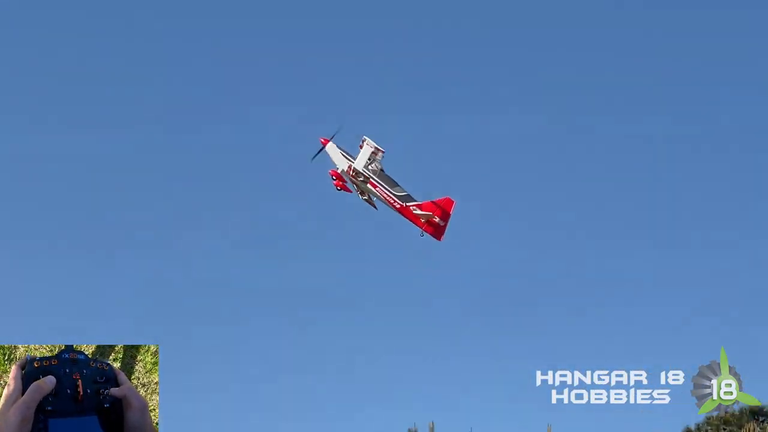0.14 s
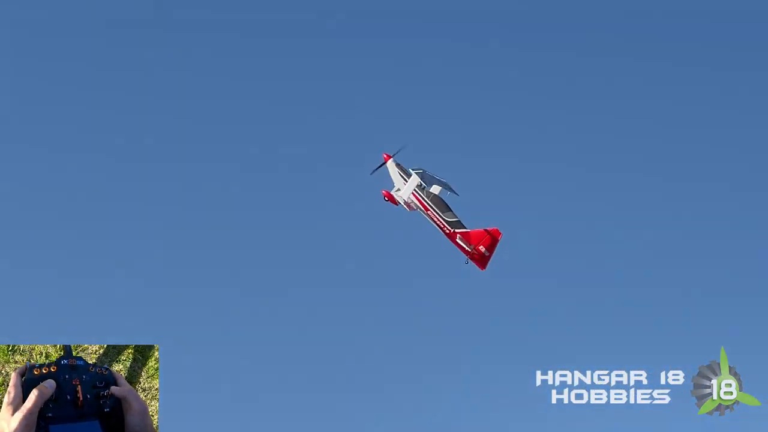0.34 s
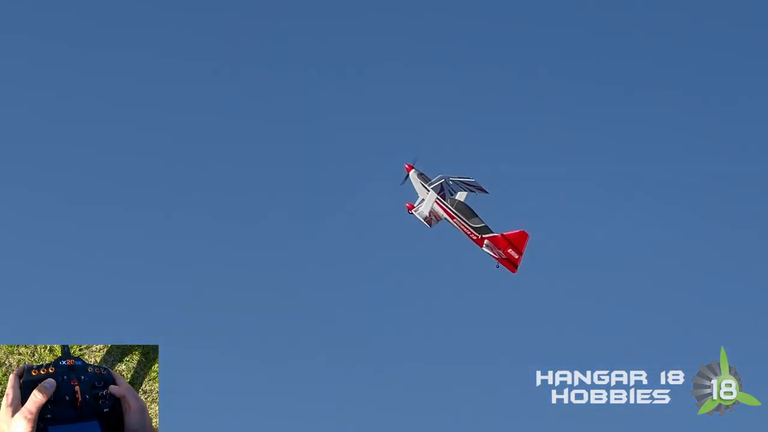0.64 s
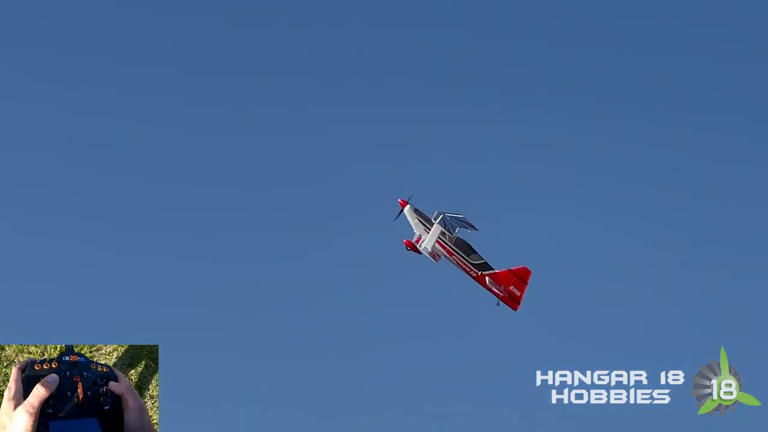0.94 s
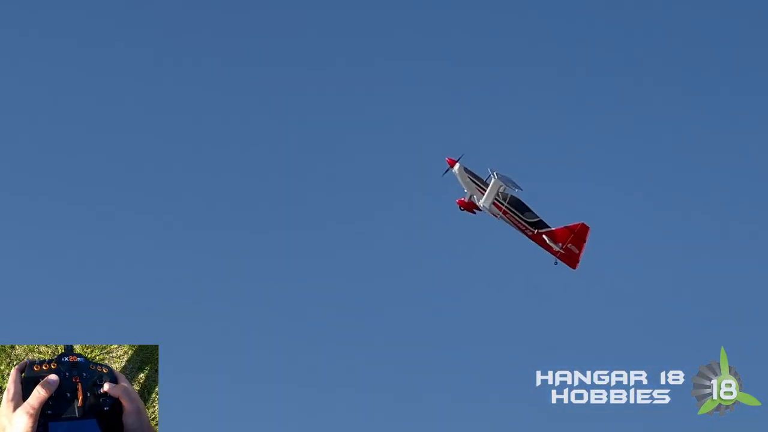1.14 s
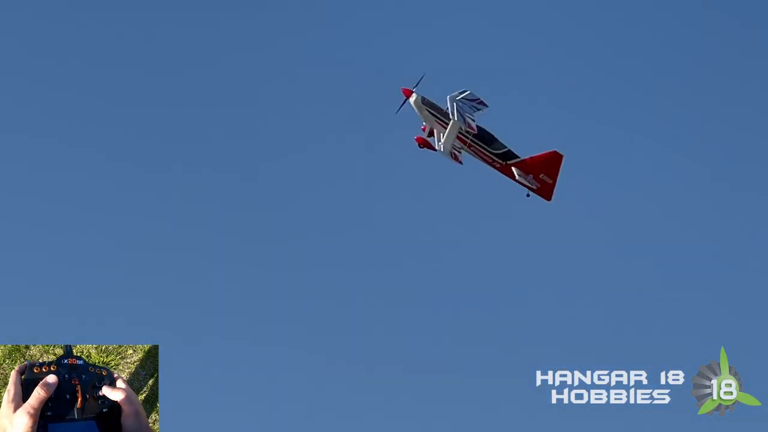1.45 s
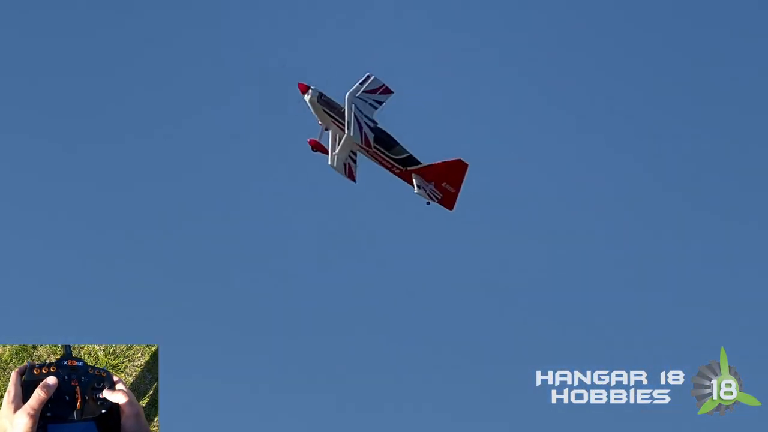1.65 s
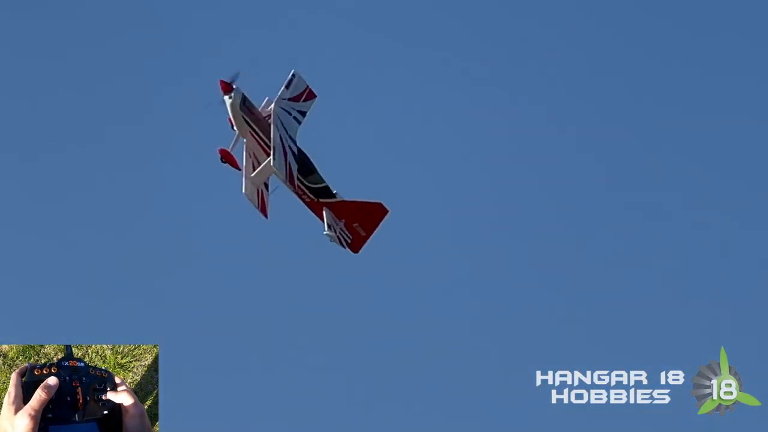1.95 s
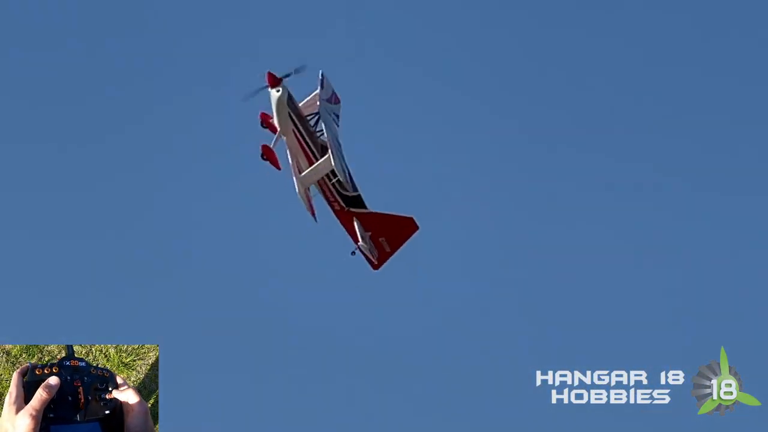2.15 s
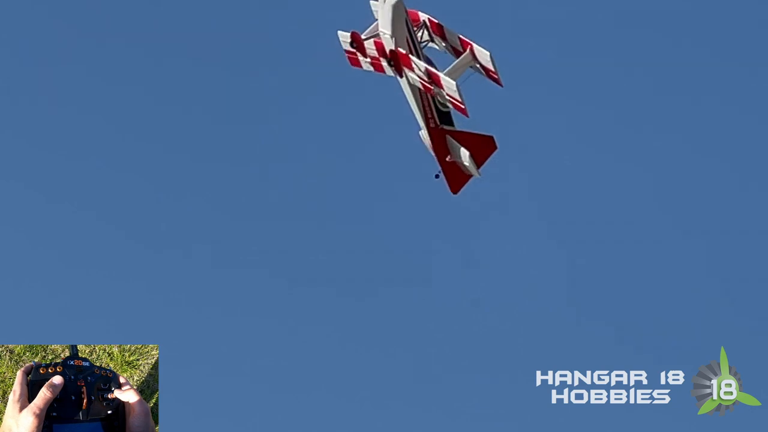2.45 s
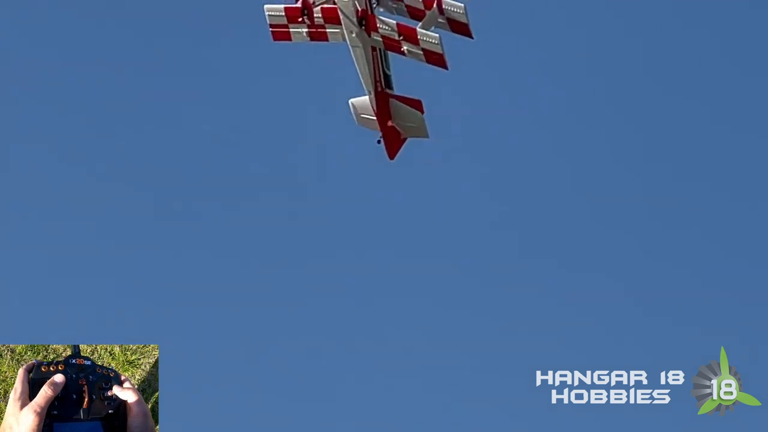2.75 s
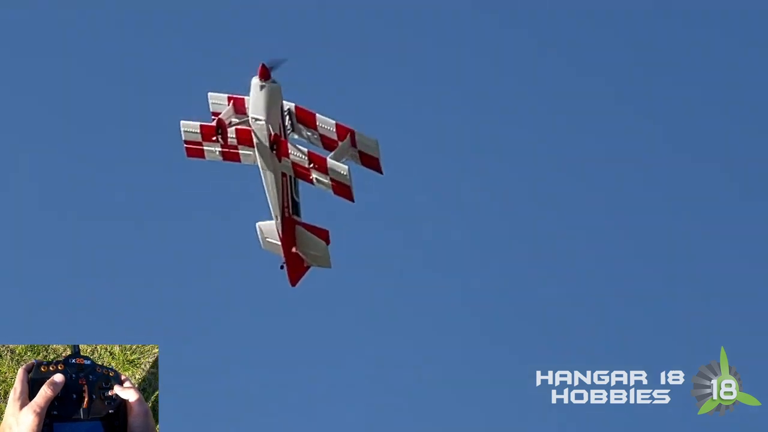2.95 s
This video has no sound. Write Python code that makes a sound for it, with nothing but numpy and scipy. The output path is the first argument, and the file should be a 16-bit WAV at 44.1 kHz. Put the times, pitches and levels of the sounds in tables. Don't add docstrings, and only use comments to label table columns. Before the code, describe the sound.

Outdoors, gusts thump and rumble on an unshielded stereo microphone while a model airplane's propeller rises from a weak swish to a louder, higher buzz, then holds its pitch in a hover, with a few tiny clicks.

```python
import sys
import numpy as np
from scipy import signal
from scipy.fft import rfft, irfft, next_fast_len
from scipy.io import wavfile
from scipy.ndimage import uniform_filter1d

SR = 44100
rng = np.random.default_rng(int(sys.argv[2]) if len(sys.argv) > 2 else 0)


def ratio_of_db(decibels):
    return 10 ** (np.asarray(decibels, float) / 20)


def put_to_file(sound):
    columns = np.atleast_2d(sound).T
    safe = np.clip(columns, -1, 1)
    whole_steps = np.round(safe * 32767)
    wavfile.write(sys.argv[1], SR, whole_steps.astype(np.int16))


N = 136710
T = np.arange(N) / SR

# start_s, shaft_hz, motor_whine_db, blade_swish_db, tip_hiss_db
MOTOR = [(0, 82.2, -57, -49, -74), (.43, 82.3, -52, -46, -70), (.55, 95, -40, -41, -59),
         (.68, 101.8, -57, -41, -57), (.76, 100.9, -52, -40, -57), (.88, 111.8, -45, -41, -61),
         (.97, 114.2, -46, -41, -60), (1.11, 111.9, -45, -40, -59), (1.24, 115.2, -44, -39, -67),
         (1.41, 119.5, -46, -35, -63), (1.5, 124.2, -45, -35, -62), (1.72, 130.8, -38, -35, -63),
         (2.1, 131.9, -34, -36, -66), (2.48, 132.3, -52, -40, -57), (2.62, 132.5, -34, -35, -51),
         (2.79, 132.5, -34, -35, -51), (2.84, 132.6, -48, -38, -53), (3.1, 132.45, -44, -34, -47)]
SHAFT_JITTER = .0002


def plane():
    speed_hz, whine_db, swish_db, tip_db = curves(MOTOR, size=1300)
    turns = np.cumsum(speed_hz * (1 + SHAFT_JITTER * slow(top_hz=44.3))) / SR
    lines = disc_tones(turns) + weak_tones(turns, swish_db)
    lines = lines + motor_whine(turns, whine_db) + switching_fold(turns, speed_hz, swish_db)
    lines = coloured(lines, lambda hz: 1 / np.sqrt(1 + (hz / 8700) ** 40))
    ports = two_ports(lines + blade_air(turns, swish_db, tip_db) + ticks())
    return ports + diffuse_air(turns, swish_db, tip_db)


# start_s, then level_db of each of DISC_ORDERS
DISC = [(0, -66, -54, -59, -81), (0.451, -63.5, -93.5, -46.5, -88), (.7, -63, -41.5, -40.5, -81),
        (.9, -32.5, -40, -45, -57.5), (1.1, -35.5, -42, -44, -65), (1.3, -27, -37, -44, -55.5),
        (1.5, -24.5, -31.5, -37.5, -41.5), (1.7, -19.5, -31, -39, -37), (1.9, -22.5, -29.5, -41.5, -37.5),
        (2.101, -25, -32, -57, -42.5), (2.3, -24, -32.5, -45.5, -42), (2.5, -26, -41, -38, -41),
        (2.7, -22.5, -58, -33.5, -35), (2.9, -23, -66, -32, -55), (3.1, -23.5, -37, -31.5, -47)]
DISC_ORDERS = (2, 3, 4, 6)


def disc_tones(turns):
    levels_db = curves(DISC, size=1800)
    return sum(tone(k * turns, db, waver_db=1.1) for k, db in zip(DISC_ORDERS, levels_db))


WEAK_ORDERS = (1, 5, 7, 8, 9, 10, 11, 12, 13, 14)
WEAK_DB = [-9, -14, -6, -12, -13, -13, -14, -11, -11, -18]
HOVER_FROM_S, HOVER_S, BEFORE_HOVER_DB = 1.8, .5, -13


def weak_tones(turns, swish_db):
    climb_db = BEFORE_HOVER_DB * np.clip(1 - (T - HOVER_FROM_S) / HOVER_S, 0, 1)
    out = 0
    for order, db in zip(WEAK_ORDERS, WEAK_DB):
        level_db = swish_db + db + (order in (5, 7)) * climb_db
        out = out + tone(order * turns, level_db, waver_db=3.5)
    return out


# start_s, then level_db of each of WHINE_ORDERS
WHINE = [(0, -72, -66, -72, -86), (.42, -62, -64, -61, -82), (.52, -52, -60, -51, -60),
         (.66, -51, -63, -52, -58), (.73, -55, -62, -70, -63), (.82, -52, -56, -68, -64),
         (.92, -58, -50, -54, -84), (1.1, -56, -48, -50, -88), (1.25, -58, -47, -62, -90),
         (1.42, -53, -47, -66, -90), (1.62, -54, -52, -52, -90), (1.9, -54, -56, -64, -90),
         (2.2, -54, -51, -59, -90), (2.35, -60, -54, -58, -90), (2.55, -61, -54, -67, -90),
         (2.75, -47, -53, -52, -90), (2.9, -53, -60, -58, -90), (3.1, -51, -54, -56, -90)]
WHINE_ORDERS = (21, 28, 63, 84)
MAIN_WHINE_ORDER = 42


def motor_whine(turns, main_db):
    out = tone(MAIN_WHINE_ORDER * turns, main_db, waver_db=1.5)
    for order, db in zip(WHINE_ORDERS, curves(WHINE, size=1800)):
        out = out + tone(order * turns, db, waver_db=1.5)
    return out


SWITCH_HZ, FOLD_DB = 17950, -27
FULL_POWER_HZ, FOLD_FADE_DB_PER_HZ = 122, 5


def switching_fold(turns, speed_hz, swish_db):
    level_db = swish_db + FOLD_DB - FOLD_FADE_DB_PER_HZ * np.maximum(speed_hz - FULL_POWER_HZ, 0)
    return tone(SWITCH_HZ * T - WHINE_ORDERS[-1] * turns, level_db, waver_db=3.5)


# freq_hz, density_db (per Hz)
SWISH = [(150, 3.5), (450, -4.5), (650, -11), (1100, -2), (1600, -10.5), (2600, -9), (5400, -10.5),
         (6100, -10.5)]
# freq_hz, density_db (per Hz)
TIP_HISS = [(4500, -14), (6000, -3), (7000, 0), (8400, -4), (9300, -14), (10500, -28), (12500, -34),
            (15600, -44)]
# centre_hz, width_hz, boost_db
AIRFRAME = [(1490, 170, 8), (1150, 150, 3), (2230, 200, 3.5), (3550, 260, 6), (1700, 100, 6.5)]


def blade_air(turns, swish_db, tip_db):
    hiss = coloured(swish(turns, TIP_HISS), lambda hz: hz > 3000)
    air = ratio_of_db(swish_db) * swish(turns, SWISH) + ratio_of_db(tip_db) * hiss

    def resonances(hz):
        return ratio_of_db(2 + sum(db / (1 + (2 * (hz - f) / width) ** 2) for f, width, db in AIRFRAME))

    return coloured(air, resonances)


# freq_hz, density_db (per Hz)
TOP_AIR = [(8500, -20), (9800, -2), (10500, -4), (12500, -6), (14000, -10), (15200, -22), (16000, -40)]
TOP_AIR_DB, DIFFUSE_DB = -15, -4.5


def diffuse_air(turns, swish_db, tip_db):
    top = np.array([swish(turns, TOP_AIR), swish(turns, TOP_AIR)])
    broad = np.array([swish(turns, SWISH), swish(turns, SWISH)])
    top = ratio_of_db(tip_db + TOP_AIR_DB) * coloured(top, lambda hz: hz > 8000)
    return top + ratio_of_db(swish_db + DIFFUSE_DB) * broad


CHOP, WOBBLE = .3, .22
PATCH_DB, FLICKER_DB = 1.8, .8


def swish(turns, spectrum):
    frames, hz = N // 128 + 6, np.fft.rfftfreq(512, 1 / SR)
    a, b, patches = rng.standard_normal((frames, 257, 3)).T
    flicker = evened(uniform_filter1d(patches[:60].sum(0), size=8))
    patches = uniform_filter1d(patches, size=3, axis=0)
    patches = evened(uniform_filter1d(patches, size=50, axis=1))
    low_edge = 1 / (1 + (120 / (hz + 1)) ** 4)
    high_edge = 1 / (1 + (hz / spectrum[-1][0] / 1.243) ** 12)
    level_db = read(spectrum, hz)[:, None] + PATCH_DB * patches + FLICKER_DB * flicker
    z = (a + 1j * b) * (low_edge * high_edge)[:, None] * ratio_of_db(level_db)
    noise = signal.istft(z, nperseg=512, noverlap=384)[1][:N]
    return evened(noise * (1 + CHOP * np.cos(4 * np.pi * turns) + WOBBLE * np.cos(2 * np.pi * turns)))


def tone(turns, db, waver_db):
    level = ratio_of_db(db + waver_db * slow(top_hz=14))
    return np.sqrt(2) * level * np.sin(2 * np.pi * (turns + rng.random()))


# start_s, level_db
TICKS = [
    (.757, -37),
    (1.062, -33),
    (1.129, -26),
    (1.136, -27),
]


def ticks():
    out, t = np.zeros(N), np.arange(300) / SR
    for s, db in TICKS:
        out[round(s * SR):][:300] += ratio_of_db(db - 60 * t / 0.0092) * rng.standard_normal(300)
    return coloured(out, lambda hz: 1 / (1 + (hz / 6500) ** 6) / (1 + (1500 / (hz + 1)) ** 4))


# freq_hz, left_lead_rad
PORT_PHASE = [(350, 0), (550, .6), (1000, 3.3), (1850, 6.8), (2600, 4.7), (3800, 6.8), (4600, 6.3),
              (6800, 9.3)]
# freq_hz, left_minus_right_db
PORT_DB = [(600, -1), (850, 7), (1400, -1.5), (2200, 16.5), (3000, 3), (4500, 8), (5500, -2.5), (8500, 13)]


def two_ports(x):
    side = np.array([[.5], [-.5]])

    def response(hz):
        return ratio_of_db(side * read(PORT_DB, hz)) * np.exp(1j * side * read(PORT_PHASE, hz))

    return coloured(x, response)


# start_s (middle), length_s, left_db, right_db
GUSTS = [(.01, 0.095, -17, -0.5), (0.085, 0.15, -2, -13.5), (0.165, 0.033, -9.5, -2.5),
         (0.203, 0.042, -1, -1), (0.24, 0.048, 1, 3.5), (0.295, 0.045, -3, -1), (0.372, 0.23, -4, -13.5),
         (0.435, 0.15, -12, -1.5), (0.58, 0.043, -10.5, -7.5), (0.651, 0.037, -52, -4.5),
         (0.804, 0.13, -10, -11), (0.873, 0.15, -14, -21.5), (0.999, 0.55, -19.5, -18),
         (1.17, 0.03, -5, -26), (1.266, 0.039, -11.5, -13), (1.424, 0.1, -13.5, -12.5),
         (1.653, 0.22, -16, -13.5), (1.901, 0.065, -11, -5), (1.984, 0.06, -7, -19.5),
         (2.066, 0.039, -10, -7), (2.183, 0.062, -11.5, -4), (2.294, 0.098, -48, -11.5),
         (2.423, 0.15, -14.5, -12), (2.515, 0.054, -23.5, -20), (2.683, 0.042, -15.5, -14),
         (2.799, 0.016, -5, -43.5), (2.912, 0.077, -30, -41), (3.102, 0.11, -13.5, -11.5)]
# freq_hz, density_db (per Hz)
WIND = [(14, -15), (28, -2.5), (48, -2), (70, -10), (100, -12.5), (140, -29.5), (170, -57), (300, -77)]
BREEZE_DB, SHARED = -23.5, 0.88
BUFFET_DB, BUFFET_GROWTH, LUMP_DB = -19, 1.63, 7.5
LOW_CUT_HZ, SLAP_S = 24, .022


def wind():
    gust = bumps(*np.transpose(GUSTS)[:, :, None], BREEZE_DB)
    noise = rng.standard_normal((2, N)) + SHARED * rng.standard_normal(N)
    rumble = evened(coloured(noise, lambda hz: ratio_of_db(read(WIND, hz))))
    rumble = rumble / (0.9 + abs(signal.hilbert(rumble))) * 2.76
    rumble = coloured(gust * rumble, lambda hz: low_cut(hz) / (1 + (hz / 170) ** 8))

    buffet = evened(coloured(rng.standard_normal((2, N)), lambda hz: ratio_of_db(read(BUFFET, hz))))
    lumps = ratio_of_db(LUMP_DB * np.array([slow(top_hz=39.84), slow(top_hz=40.45)]))
    s, left_db, right_db = np.transpose(SLAPS)[:, :, None]
    slap_swell = bumps(s, SLAP_S, left_db + 4.5, right_db + 0.5, -77.5)
    bright = ratio_of_db(BUFFET_DB) * gust ** BUFFET_GROWTH * lumps + slap_swell
    return rumble + slaps() + coloured(bright * buffet, lambda hz: (hz < 2000) * low_cut(hz))


def low_cut(hz):
    return 1 / (1 + (LOW_CUT_HZ / (hz + 1)) ** 4)


# start_s, left_db, right_db
SLAPS = [(0.021, -43.5, -26.5), (0.101, -30.5, -30), (0.201, -9.5, -17), (0.24, -17, -22.5),
         (0.287, -15, -24), (0.304, -26.5, -20), (0.361, -19.5, -20.5), (0.388, -13, -27.5),
         (0.469, -48.5, -46), (0.659, -59, -41), (0.797, -30.5, -47), (2.082, -56, -32.5),
         (2.191, -43, -29), (2.231, -46, -16.5), (2.319, -45.5, -32.5)]
# freq_hz, density_db (per Hz)
BUFFET = [(40, -15.5), (120, 10.5), (200, -5.5), (350, -16.5), (600, -40), (1200, -36)]
SLAP_PUNCH_DB, SLAP_TOP_HZ = 5, 520


def slaps():
    out = np.zeros((2, N))
    for s, left_db, right_db in SLAPS:
        level = ratio_of_db(np.array([left_db, right_db]) + SLAP_PUNCH_DB)
        out[:, round(s * SR)] = level * rng.choice([-1, 1])
    hz = np.fft.rfftfreq(SR, 1 / SR)
    steps = coloured(out, lambda f: 1j * ratio_of_db(read(BUFFET, f)) / (1 + (f / SLAP_TOP_HZ) ** 4))
    return steps / ratio_of_db(read(BUFFET, hz))[:2000].sum() * len(hz)


def bumps(s, length, left_db, right_db, floor_db):
    t = T[::50]
    shape = np.exp(-8 * ((t - s) / length) ** 2)
    levels = []
    for db in (left_db, right_db):
        power = ratio_of_db(2 * floor_db) + (ratio_of_db(2 * db) * shape).sum(0)
        levels.append(np.interp(T, t, np.sqrt(power)))
    return np.array(levels)


def evened(x):
    return x / np.sqrt(np.mean(x ** 2) + 1e-20)


def read(points, hz):
    f, value = np.transpose(points)
    return np.interp(np.log(hz + 1), np.log(f + 1), value)


def curves(table, size):
    s, *columns = np.transpose(table)
    return [uniform_filter1d(np.interp(T, s, c), size, mode="nearest") for c in columns]


def slow(top_hz):
    hz = np.geomspace(top_hz / 12, top_hz, 16)[:, None]
    t = T[::100]
    waves = np.sin(2 * np.pi * (hz * t + rng.random((16, 1)))) / np.sqrt(hz)
    return np.interp(T, t, evened(waves.sum(0)))


def coloured(x, gain):
    size = next_fast_len(N + 4096)
    return irfft(rfft(x, size) * gain(np.fft.rfftfreq(size, 1 / SR)), size)[..., :N]


def scene():
    return (plane() + wind()) * np.minimum(T / .004, 1) ** 2


def roll_off(x):
    return signal.sosfilt(signal.butter(12, 15660, fs=SR, output="sos"), x)


DUCK_FROM_DB, DUCK, RECOVER_DB_PER_S = -18, .3, 60
CEILING = 1.15


def record(dry):
    power_db = 10 * np.log10(abs(uniform_filter1d((dry ** 2).mean(0), size=800)) + 1e-12)
    fall_db = T * RECOVER_DB_PER_S
    held_db = np.maximum.accumulate(power_db + fall_db) - fall_db
    over_db = np.maximum(held_db - DUCK_FROM_DB, 0)
    ducked = dry / ratio_of_db(DUCK * uniform_filter1d(over_db, size=400))
    soft = ducked / (1 + abs(ducked / CEILING) ** 4) ** (1 / 4)
    return roll_off(soft)


dry = scene()
out = record(dry)
put_to_file(out)
```